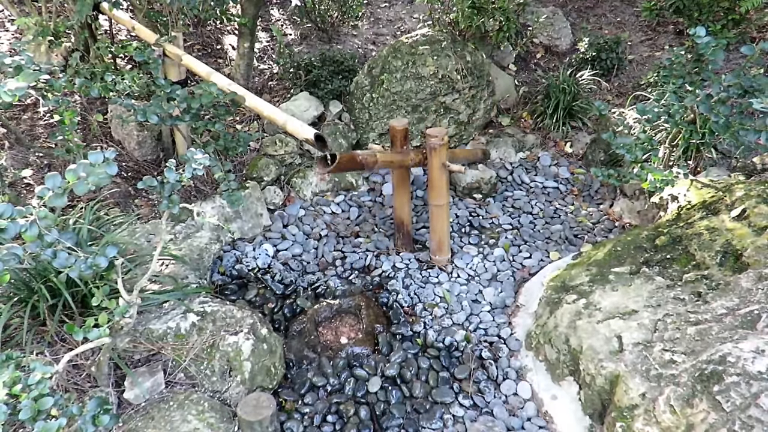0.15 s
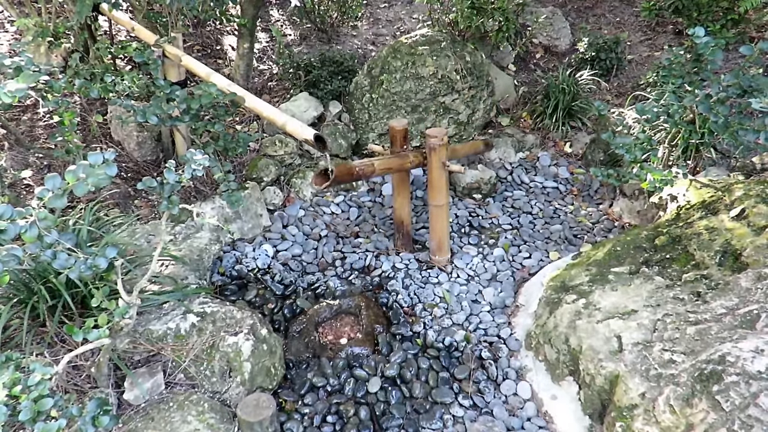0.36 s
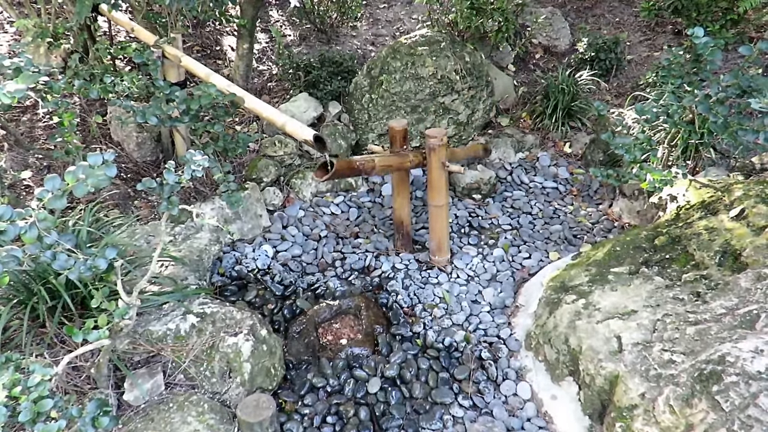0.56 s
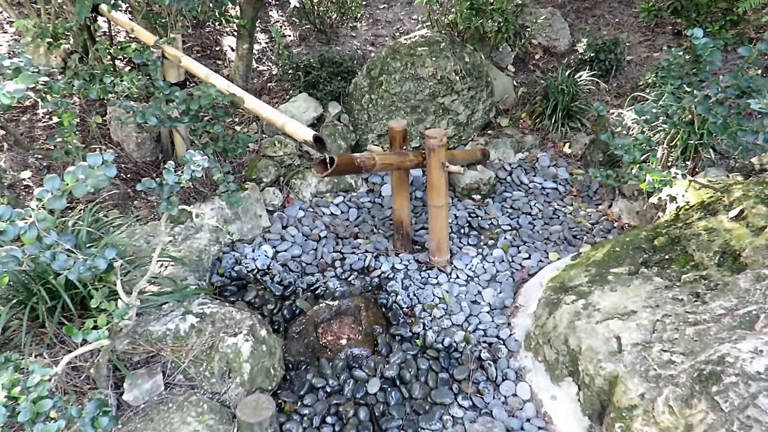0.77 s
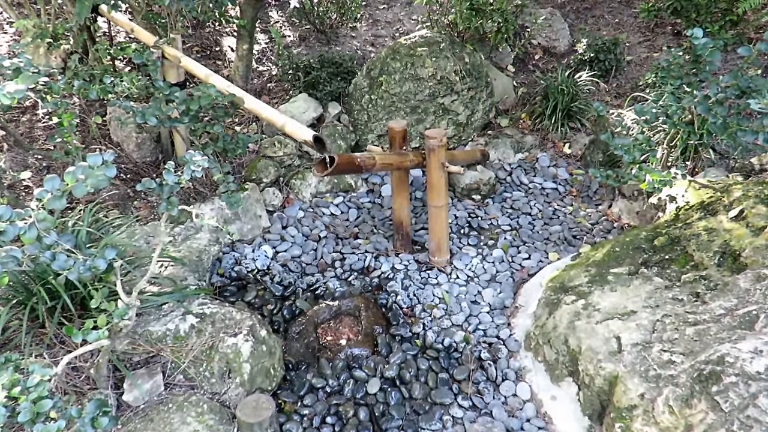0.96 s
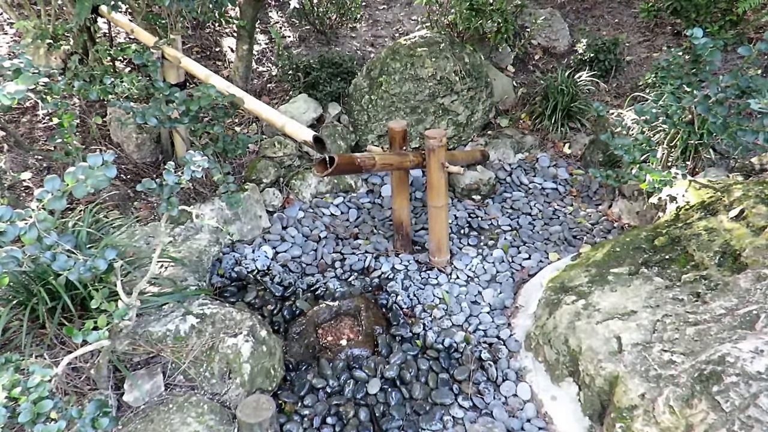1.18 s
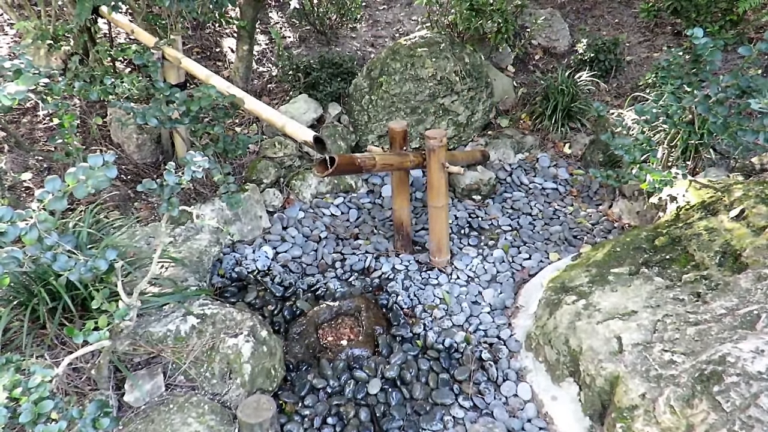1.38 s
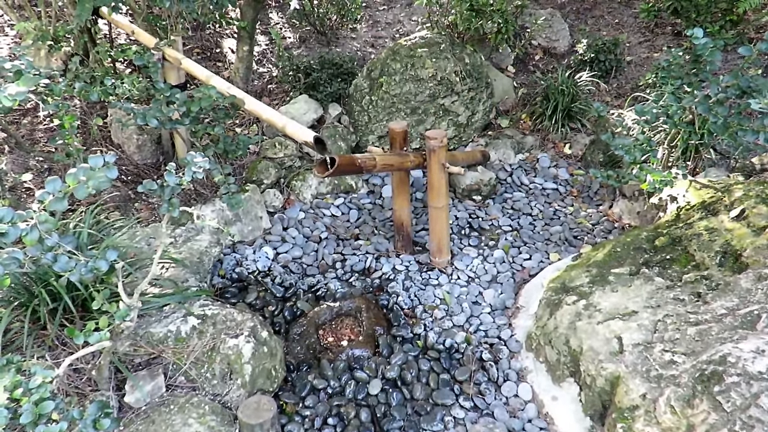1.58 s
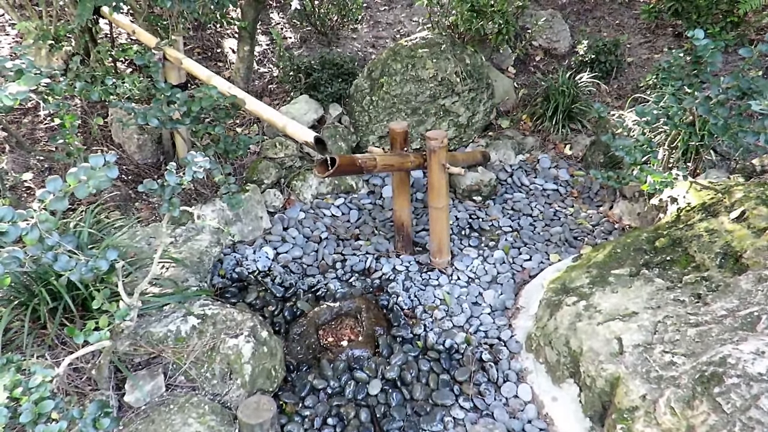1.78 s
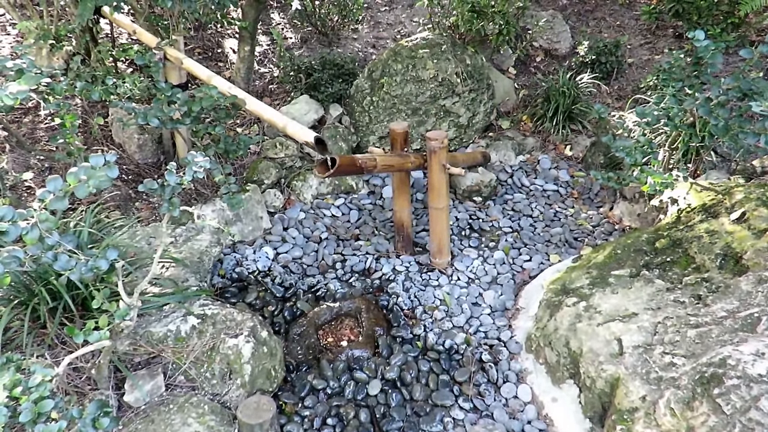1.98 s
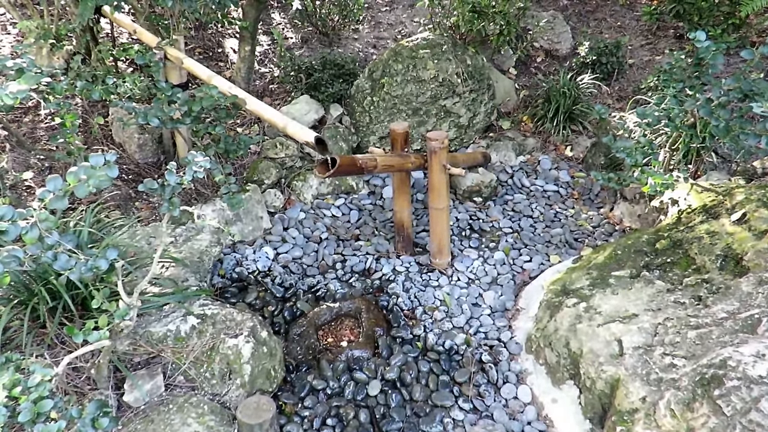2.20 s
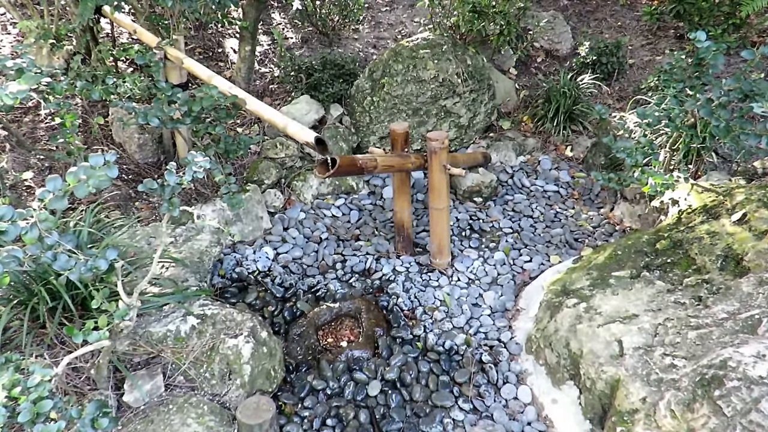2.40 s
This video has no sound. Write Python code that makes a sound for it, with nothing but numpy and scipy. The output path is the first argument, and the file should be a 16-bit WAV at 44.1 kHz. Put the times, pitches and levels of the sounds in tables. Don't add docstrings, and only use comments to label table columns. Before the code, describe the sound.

Close in stereo, a bamboo tipper drains briefly and clacks hard on its rest, echoing off nearby stones and walls, then lightly bounces; a distant warbler, dove and low engine remain in the quiet garden.

```python
import sys
import numpy as np
from scipy import signal
from scipy.fft import rfft, irfft
from scipy.io import wavfile
from scipy.ndimage import uniform_filter1d

SR = 44100
rng = np.random.default_rng(int(sys.argv[2]) if len(sys.argv) > 2 else 0)


def gain_from_db(level_db):
    decades = np.asarray(level_db, float) / 20
    return 10 ** decades


def inscribe(sig):
    pcm = np.round(np.clip(np.atleast_2d(sig).T, -1, 1) * 32767)
    wavfile.write(sys.argv[1], SR, pcm.astype(np.int16))


N = 108045


def evened(x):
    return x / np.sqrt(np.mean(x ** 2) + 1e-20)


def read(points, hz):
    f, value = np.transpose(points)
    return np.interp(np.log(hz + 1), np.log(f + 1), value)


def curve(points):
    return gain_from_db(np.interp(np.arange(N) / SR, *np.transpose(points)))


def add(mix, s, sound, pan_db=0):
    part = mix[:, round(s * SR):][:, :len(sound)]
    part += sound[:part.shape[1]] * gain_from_db([[pan_db / 2], [-pan_db / 2]])


def modes(table, t):
    return sum(gain_from_db(db - 60 * t / t60) * np.sin(2 * np.pi * hz * t) for hz, db, t60 in table)


def whistle(length, hz, edge_s):
    t = np.arange(len(hz)) / SR
    edges = np.clip(np.minimum(t, length - t) / edge_s, 0, 1)
    return np.sqrt(2) * np.sin(2 * np.pi * np.cumsum(hz) / SR) * edges


def noise(shape, patchy_db, same):
    frames, hz = N // 256 + 5, np.fft.rfftfreq(1024, 1 / SR)
    a, b, c, d, patches = rng.standard_normal((frames, 513, 5)).T
    patches = uniform_filter1d(patches, size=10, axis=0)
    patches = evened(uniform_filter1d(patches, size=8, axis=1))
    likeness = np.clip(same(hz), -1, 1)[:, None]
    left = a + 1j * b
    right = likeness * left + np.sqrt(1 - likeness ** 2) * (c + 1j * d)
    gain = gain_from_db(read(shape, hz)[:, None] + patchy_db * patches)
    sound = signal.istft(np.array([left, right]) * gain, nperseg=1024, noverlap=768)[1]
    return evened(sound[:, :N])


def tail(x, t60s, start_s):
    taps = rng.standard_normal((2, SR // 2))
    taps[1] = 0.3 * taps[0] + 1.06 * taps[1]
    hz, t, z = signal.stft(taps, SR, nperseg=256)
    h = signal.istft(z * gain_from_db(-60 * t / read(t60s, hz)[:, None]), SR, nperseg=256)[1]
    h = h * np.minimum(np.arange(h.shape[1]) / SR / start_s, 1)
    return signal.fftconvolve(x, h / np.linalg.norm(h[0]), axes=1)[:, :N]


# t/s, thump level/dB, clack level/dB, long ring level/dB
TUBE_BLOWS = [
    (0.2325, -10, -23, -20),
    (0.2353, 1.5, -3, -47.5),
    (.6195, -29.5, -36.5, -29.5),
    (0.645, -39.5, -38, -56),
    (0.6671, -37, -37.5, -48),
    (0.6774, -34, -40.5, -50),
    (0.693, -51, -40, -54),
]


def knock():
    low, high, sharp = np.zeros((3, 2, N))
    t = np.arange(SR // 2) / SR
    for s, thump_db, clack_db, ring_db in TUBE_BLOWS:
        add(low, s, thump_and_rings(t, thump_db, clack_db, ring_db), 0.8)
        add(high, s, wall_clack(t, clack_db), -1)
        add(sharp, s, crack(t, clack_db), -1)
    near_and_far = low + high + sharp + garden_return(low, high, sharp)
    low_cut = signal.butter(4, 125, "high", fs=SR, output="sos")
    return signal.sosfilt(low_cut, near_and_far)


# f/Hz, level/dB, t60/s
LONG_RINGS = [(120, -16, 0.18), (269.1, -5.5, 0.45), (1153, -13, .12), (1400, -10, 0.08)]
# f/Hz, level/dB, t60/s
POST_MODES = [(141, -35, 1), (337, -24.5, 0.22), (576, -24.5, 0.45), (721, -27, .25)]


def thump_and_rings(t, thump_db, clack_db, ring_db):
    thump_hz, hold_s, t60 = 272, 0.0057, 0.009
    rise_s = 0.00007 * abs(clack_db) + 1e-5
    thump = np.sin(2 * np.pi * thump_hz * t) * gain_from_db(-60 * np.maximum(t - hold_s, 0) / t60)
    thump = gain_from_db(thump_db) * thump * np.minimum(t / rise_s, 1)
    return thump + gain_from_db(ring_db) * modes(LONG_RINGS, t) + gain_from_db(clack_db) * modes(POST_MODES, t)


# f/Hz, level/dB, t60/s
WALL_MODES = [(482.4, -3, 0.078), (714, -18.5, 0.18), (747, -13.5, 0.12), (898, -3.5, 0.028),
              (1040, -9, 0.033), (1125, -10, 0.053), (1237, 5, 0.045), (1335, 3, 0.035), (1457, 7, 0.019),
              (1730, 1.5, .04), (1820, 1, 0.045), (2093, -2.5, 0.039), (2340, -8, 0.019), (2865, -39, .015)]


def wall_clack(t, clack_db):
    contact_s = 0.00027 * gain_from_db(-0.22 * clack_db)
    touch = np.hanning(round(contact_s * SR) + 3)
    return gain_from_db(clack_db) * 0.32 * np.convolve(modes(WALL_MODES, t), touch / touch.sum())


# f/Hz, level/dB
CRACK_SPECTRUM = [(300, -37), (1500, -11.5), (2500, -4), (3000, 4), (4200, 9), (6000, -8), (8000, -18),
                  (12000, -26), (16000, -38)]


def crack(t, clack_db):
    shape = gain_from_db(read(CRACK_SPECTRUM, np.fft.rfftfreq(len(t), 1 / SR)))
    burst = evened(irfft(rfft(rng.standard_normal(len(t))) * shape, len(t)))
    t60, rise_s = 0.0105, 0.0012
    return burst * gain_from_db(-4.5 + 1.22 * clack_db - 60 * t / t60) * np.minimum(t / rise_s, 1)


# delay t/s, level/dB, smear/s, left-right level/dB
WALL_ECHOES = [
    (.005, -8, 0.0026, 4),
    (.0105, 0, .004, 1),
    (.0145, -8, .003, -4),
    (.021, -13, .004, 3),
    (0.0285, -6, .008, -0.5),
    (.044, -28, .015, -3),
    (.056, -28, .015, 20.5),
    (0.086, -22.5, .025, 4),
]
# f/Hz, t60/s
GARDEN_DECAY = [(150, 0.34), (500, 0.8), (1500, .45), (2500, 0.3), (4500, .3), (12000, 0.25)]
# f/Hz, t60/s
LEAF_SCATTER = [(2000, .14), (5000, .17), (10000, .16)]


def garden_return(low, high, sharp):
    taps = np.zeros((2, SR // 5))
    for delay, db, smear, pan_db in WALL_ECHOES:
        chance = rng.standard_normal((1200, 2))
        sparse = abs(chance[:, 1]) > 1.2
        cluster = chance[:, 0] * np.exp(-np.arange(1200) / SR / smear) * sparse
        add(taps, delay, gain_from_db(db) * cluster / np.linalg.norm(cluster), pan_db)
    sent = high + sharp + gain_from_db(-23) * low
    echoes = signal.fftconvolve(sent, taps, axes=1)[:, :N]
    return echoes + gain_from_db(-17.5) * tail(sent, GARDEN_DECAY, 0.0067) + gain_from_db(1) * tail(sharp, LEAF_SCATTER, 0.006)


# t/s, level/dB, f/Hz, left-right level/dB
BIG_DROPS = [(.0159, -24, 1950, -1), (0.024, -36, 1370, -2), (.021, -35, 2900, 2), (.057, -30, 2260, 3),
             (0.065, -27, 2730, -2), (.1087, -29, 2490, -4), (0.1247, -27, 2090, 2),
             (0.138, -35.5, 1070, 2), (0.1785, -24, 2280, -3), (.144, -36, 1900, 0), (.038, -37, 2900, 0),
             (.001, -38, 9000, 4), (.006, -35, 6200, -4), (.016, -36, 4900, 3), (.0218, -29, 4900, -1),
             (.023, -36, 6600, 4), (.023, -42, 9200, -5), (.029, -35, 5000, -3), (.038, -34, 5000, 3),
             (.064, -37, 4750, -2), (.067, -41, 8800, 5), (.089, -39, 5600, -4), (.138, -46, 8500, 4),
             (.147, -40, 4900, 3), (.1695, -41, 7000, -4), (.172, -40, 5200, 2), (.203, -42, 7600, 4),
             (.207, -44, 8300, -4)]


def drops():
    out, t = np.zeros((2, N)), np.arange(800) / SR
    t60, pitch_rise, echo_s = 0.013, 0.055, 0.0045
    for s, db, hz, pan_db in BIG_DROPS:
        rough = 1 + 0.35 * evened(np.convolve(rng.standard_normal(800), np.hanning(30), "same"))
        tone = np.sin(2 * np.pi * hz * t * (1 + pitch_rise * t / t60))
        drop = gain_from_db(db - 60 * t / t60) * np.minimum(t / 0.0005, 1) * rough * tone
        add(out, s, drop, pan_db)
        add(out, s + echo_s, gain_from_db(-7) * drop, -pan_db)
        spray = np.convolve(rng.standard_normal(805), [1, 2, 1, -1, -2, -1], "valid")
        puff = gain_from_db(db - 28 - 30 * t / t60) * spray * np.minimum(t / 0.002, 1)
        add(out, s, puff, 3 * pan_db)
    return out


# f/Hz, level/dB per Hz
SPLASH_SPECTRUM = [(70, -36), (190, 1), (350, -7), (900, -10.5), (2500, -14.5), (5500, -17), (9000, -28),
                   (15500, -47.5)]


def fizz():
    out, t = np.zeros((2, N)), np.arange(800) / SR
    per_s = 4000
    for hz in np.geomspace(1200, 13000, 16):
        size = gain_from_db(3 * np.minimum(rng.exponential(1, (2, N)), 4))
        size = size * (rng.random((2, N)) < per_s / 32 / SR)
        grain = np.sin(2 * np.pi * hz * t) * np.exp(-t * hz / 2.2) * np.minimum(t * hz, 1)
        grain = grain * gain_from_db(read(SPLASH_SPECTRUM, hz)) * np.sqrt(hz)
        out += signal.fftconvolve(size + 0.1 * size[::-1], grain[None], axes=1)[:, :N]
    return evened(out) * gain_from_db(-2 - 25 * np.arange(N) / SR)


# t/s, level/dB
POUR_LEVEL = [
    (0, -36.5),
    (.045, -41.5),
    (.13, -43),
    (.2, -46.5),
    (.225, -45),
    (.5, -70.5),
]


def water():
    single = drops()
    bubbles = fizz()
    spatter = gain_from_db(2.2 * evened(np.convolve(rng.standard_normal(N), np.hanning(600), "same")))
    likeness = [(200, 0.68), (3000, 0.5), (8000, 0.1)]  # f/Hz, left-right likeness
    wash = noise(SPLASH_SPECTRUM, patchy_db=1.5, same=lambda hz: read(likeness, hz))
    scatter = gain_from_db(-10) * tail(single, [(1000, 0.08), (8000, 0.07)], 0.0037)
    return single + scatter + curve(POUR_LEVEL) * spatter * (wash + bubbles)


# t/s, f/Hz, level/dB
NEAR_PHRASE = [(2.253, 2750, -74), (2.278, 3220, -56), (2.297, 3400, -58), (2.305, 3480, -68),
               (2.32, 3450, -60), (2.326, 3000, -76), (2.336, 2860, -63), (2.354, 3380, -54),
               (2.364, 3800, -59), (2.372, 3880, -55), (2.379, 4500, -60), (2.386, 4750, -82),
               (2.397, 4450, -58), (2.412, 3450, -51), (2.42, 3150, -60), (2.45, 2520, -59)]
# t/s, length/s, from f/Hz, to f/Hz, level/dB
ANSWER_NOTE = (2.273, .035, 3750, 4080, -63)


def near_birds():
    out = np.zeros((2, N))
    s, length, a, b, db = ANSWER_NOTE
    add(out, s, gain_from_db(db) * whistle(length, np.linspace(a, b, round(length * SR)), 0.006), -1)
    s, hz, db = np.transpose(NEAR_PHRASE)
    t = np.arange(s[0], s[-1], 1 / SR)
    add(out, s[0], gain_from_db(np.interp(t, s, db)) * whistle(1, np.interp(t, s, hz), 0.01), 1)
    return out


# t/s, length/s, from f/Hz, to f/Hz, level/dB
WARBLER_NOTES = [(.33, 0.07, 5500, 5900, -65), (0.342, 0.07, 4100, 4000, -60.5),
                 (0.437, 0.04, 4460, 5750, -64), (0.474, 0.06, 4200, 3100, -58.5)]
# t/s, level/dB
RISING = [(0.61, -57), (0.762, -57), (0.912, -58), (1.062, -57), (1.215, -57)]
FALLING = [(0.668, -60), (0.82, -59), (0.97, -58), (1.125, -59)]
# t/s, level/dB
TRILL = [(1.297, -56), (1.405, -52.5), (1.507, -56), (1.607, -56), (1.712, -57), (1.812, -58), (1.912, -59)]
WARBLER_NOTES += [(s, 0.055, 3950, 4780, db) for s, db in RISING]
WARBLER_NOTES += [(s, 0.045, 3700, 3150, db) for s, db in FALLING]
for s, db in TRILL:
    WARBLER_NOTES += [(s + 0.006, 0.022, 4200, 3050, db + 1.5), (s + 0.006, 0.04, 4850, 4000, db - 4)]
WARBLER_NOTES += [(1.75, 0.02, 2900, 2450, -66), (1.42, 0.035, 3400, 3250, -63)]


def warbler():
    out = np.zeros((2, N))
    for s, length, a, b, db in WARBLER_NOTES:
        u = np.arange(0, length, 1 / SR) / length
        drift = evened(uniform_filter1d(rng.standard_normal(4000), size=60))[:len(u)]
        warble_hz = 110 * (length / 0.051) ** 2 * drift
        pitch = b + (a - b) * (1 - u) ** 1.3 + warble_hz
        add(out, s, gain_from_db(db) * whistle(length, pitch, 0.0026), -2.5)
    return out


# t/s, length/s, level/dB
THIN_CALLS = [(0.444, 0.11, -72), (0.981, 0.071, -73), (1.39, 0.07, -73), (1.727, 0.09, -74.5),
              (2.134, 0.14, -76.5)]


def thin_calls():
    out = np.zeros((2, N))
    call_hz, width_hz = 7420, 230
    for s, length, db in THIN_CALLS:
        wobble = evened(uniform_filter1d(rng.standard_normal(round(0.4 * SR)), size=90))
        add(out, s, gain_from_db(db) * whistle(length, call_hz + width_hz * wobble, 0.013))
    return out


# t/s, length/s, level/dB
DOVE_COOS = [
    (.55, 0.36, -57.5),
    (2.34, .2, -59.5),
]


def dove():
    out = np.zeros((2, N))
    for s, length, db in DOVE_COOS:
        add(out, s, gain_from_db(db) * whistle(length, np.full(SR // 2, 482), 0.032))
    return out


def birds():
    near = near_birds() + dove()
    song = warbler() + thin_calls()
    wet = tail(gain_from_db(7) * song + gain_from_db(-4) * near, [(500, 0.45), (8000, 0.45)], 0.0013)
    return gain_from_db(-0.5) * song + near + wet


# f/Hz, level/dB per Hz
AIR_SPECTRUM = [(15, -36), (25, -9), (289, -13), (331, -11.5), (648, -10), (703, -10.5), (919, -10.5),
                (1240, -14), (15500, -38)]
# f/Hz, left-right likeness
AIR_LIKENESS = [(30, 0.3), (150, 0.27), (600, 0.23), (2000, 0.13), (5000, .2), (12000, 0.0854)]


def leaves_and_town():
    return gain_from_db(-51.5) * noise(AIR_SPECTRUM, patchy_db=1.0, same=lambda hz: read(AIR_LIKENESS, hz))


# f/Hz, level/dB
ENGINE_SPECTRUM = [(40, -4), (90, -4), (150, 6.5), (230, 0), (400, -9), (1000, -7), (2500, -40.5)]
# t/s, level/dB
ENGINE_PASSING = [(0, -44), (.15, -42), (.22, -47), (.45, -57.5), (.8, -54), (1.0, -55), (1.3, -51),
                  (1.4, -51), (1.45, -74), (2.45, -103)]


def passing_engine():
    rumble = noise(ENGINE_SPECTRUM, patchy_db=1.5, same=lambda hz: 0.64 + 0 * hz)
    return curve(ENGINE_PASSING) * rumble


def scene():
    return knock() + water() + birds() + leaves_and_town() + passing_engine()


def low_pass(x):
    return signal.sosfilt(signal.butter(12, 15910, fs=SR, output="sos"), x)


def record(dry):
    over = dry - dry / (1 + dry ** 6) ** (1 / 6)
    lows = signal.sosfiltfilt(signal.butter(2, 80, fs=SR, output="sos"), over)
    clipped = dry - over + lows
    edge_hz = np.array([0, 9, 15.4, 16, SR / 2000]) * 1000
    band_limit = signal.firwin2(255, edge_hz, [1, 1, gain_from_db(-7), 0, 0], fs=SR)[None]
    mix = signal.oaconvolve(clipped, band_limit, "same")
    return low_pass(mix)


dry = scene()
out = record(dry)
inscribe(out)
```